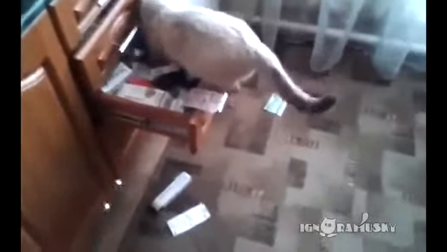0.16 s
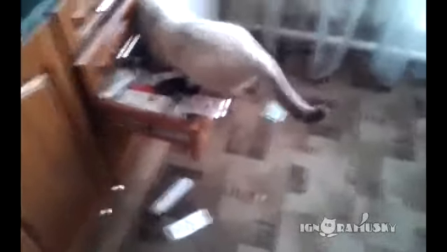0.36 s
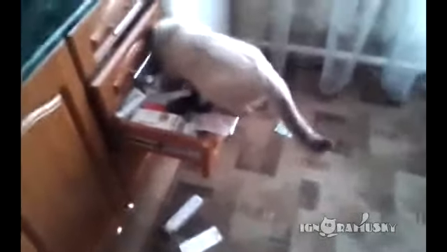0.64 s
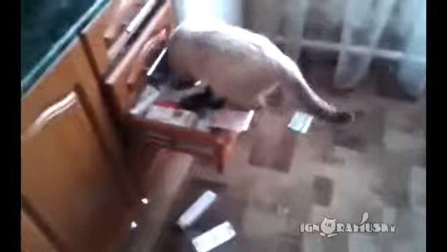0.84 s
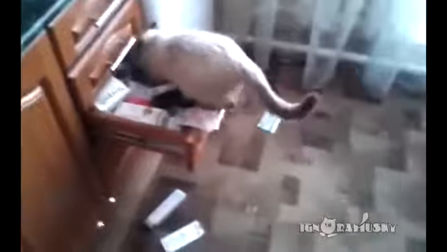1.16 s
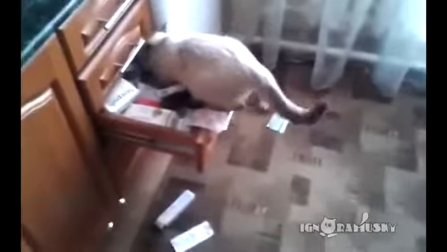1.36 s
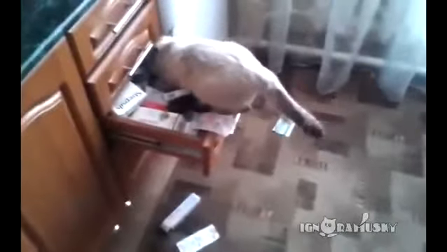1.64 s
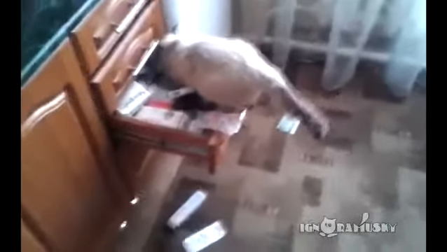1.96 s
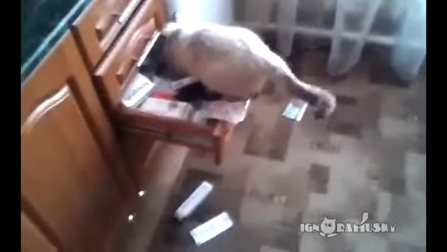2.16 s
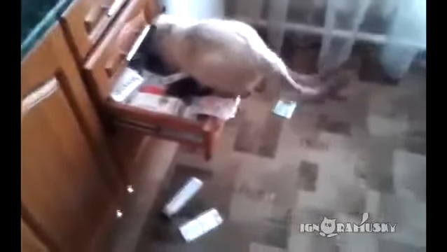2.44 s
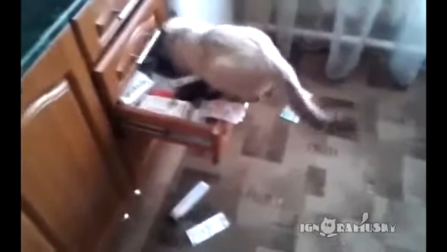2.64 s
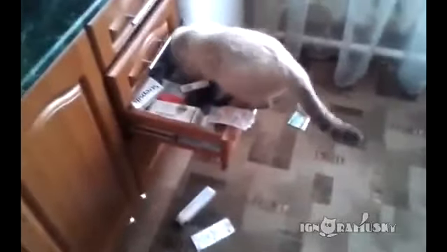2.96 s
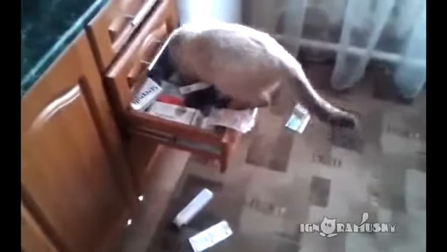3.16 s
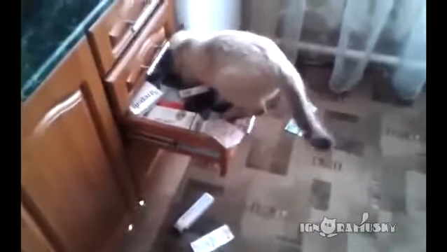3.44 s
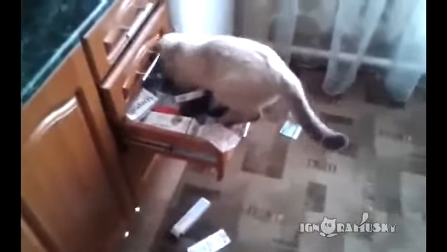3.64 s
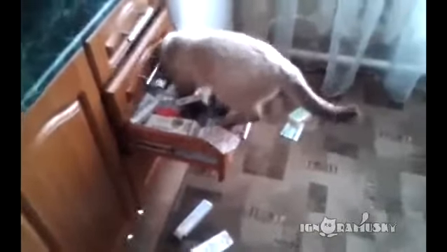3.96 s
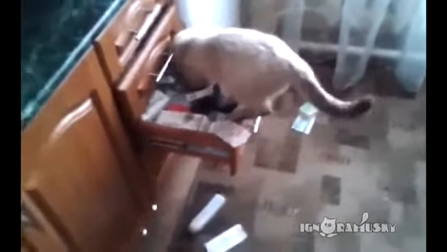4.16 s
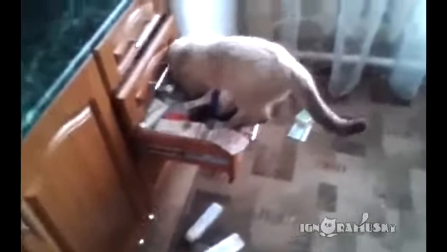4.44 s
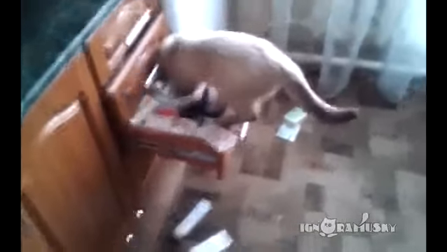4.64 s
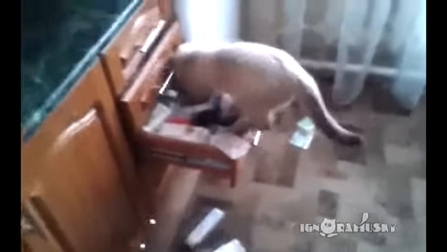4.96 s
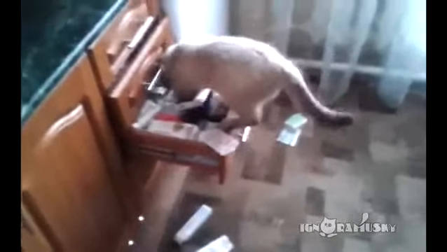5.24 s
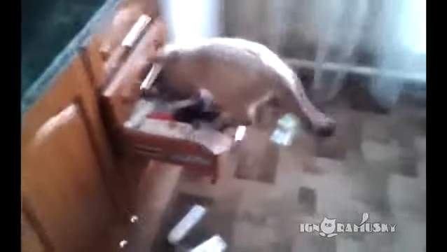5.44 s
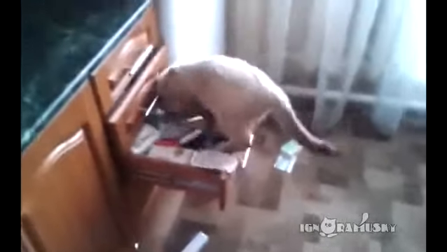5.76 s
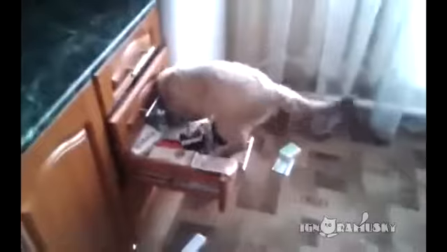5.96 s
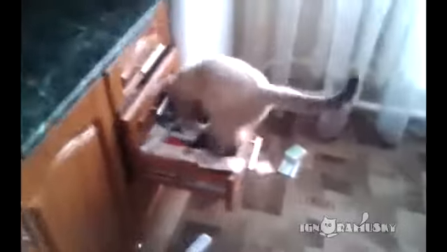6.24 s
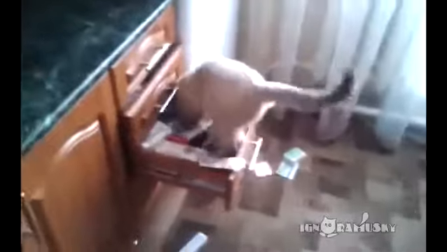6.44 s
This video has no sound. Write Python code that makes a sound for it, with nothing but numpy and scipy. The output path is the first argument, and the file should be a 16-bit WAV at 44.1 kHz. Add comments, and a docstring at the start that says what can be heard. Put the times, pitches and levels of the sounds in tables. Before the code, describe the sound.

Paws push cardboard boxes and wrappers around inside a wooden drawer. Uneven low-mid thuds and hollow knocks mix with crisp papery swipes and brief rasps, pausing around two seconds and returning stronger. The last second is the busiest, with bright film crinkles and sharp knocks. The room is small and quiet with a short reverberation; the hand-held microphone is fairly near, and a few dry snaps hit it directly.

```python
"""Cat in a kitchen drawer

Place: a small kitchen, where a cat digs about in an open wooden drawer; the room behind is quiet.
Its paws knock boxes against the wood: decaying modes boom, and filtered bursts of contacts clatter.
Paper and plastic wrappers rustle as clumps of tiny snaps; sliding things rasp through one resonance.
No distance at all: now and then a dry crackle of one-sided spikes sounds at the hand-held microphone."""
import sys
import numpy as np
from scipy import signal
from scipy.fft import rfft, irfft
from scipy.io import wavfile
from scipy.ndimage import uniform_filter1d, map_coordinates

SR = 44100
rng = np.random.default_rng(int(sys.argv[2]) if len(sys.argv) > 2 else 0)


def waveform_to_disk(signal):
    """Save audio, clipped to [-1, 1], as 16-bit WAV at the path in sys.argv[1]."""
    frames = np.transpose(np.atleast_2d(signal))
    scaled = np.clip(frames, -1, 1) * 32767
    samples = np.round(scaled).astype(np.int16)
    wavfile.write(sys.argv[1], SR, samples)


N = 291501  # length of the scene [samples]
T = np.arange(int(0.8 * SR)) / SR  # time axis of one short event [s]

# Quiet room, relative spectrum: f/Hz, density level/dB [per Hz]
HUSH_SPECTRUM = [(20,-3.5),(80,-17.5),(200,-12),(400,-28),(700,-43),(4000,-40),(13000,-45.5)]
# Reverberation of the kitchen: f/Hz, t60/s
KITCHEN_DECAY = [(150,0.44),(700,0.29),(2000,0.37),(5000,0.27),(12000,0.21)]
# Dry snaps close to the microphone: t/s, spike level before filtering/dB
CRACKLE_SNAPS = [(1.1695, -2.5), (1.172, -1.5), (1.181, -20), (3.7264, -15.5), (3.749, -14),
                 (3.7757, -12.5), (4.5923, -15), (4.5994, -21.5), (5.41, -2), (5.4212, -13.5), (5.596, -14),
                 (5.607, -8), (5.6095, -20), (5.6235, -32), (5.637, -9.5), (5.659, -16), (5.6671, -12.5)]
# Rasps and squeaks of sliding things, one row per resonance:
# t/s, length/s, mean f/Hz, width/Hz, level before fades and reflections/dB
SLIDE_RESONANCES = [(1.296,0.0592,1640,1400,-30),(1.494,0.024,2090,350,-35),(1.595,0.17,1090,300,-45.5),(3.23,0.035,2690,1900,-34.5),(3.364,0.034,1400,700,-44),(3.45,0.093,2690,1700,-51),(4.057,0.044,2590,900,-43.5),
                    (4.786,0.13,2480,497,-52.5),(5.342,0.051,5960,700,-44),(6.108,0.14,800,350,-35.5),(6.355,0.032,3750,504,-34),(6.428,0.068,3900,700,-38)]
# How hard the cat digs, as the level of boxes shuffling on the wood: t/s, level/dB
DIGGING_CURVE = [(0.0, -51), (0.72, -38), (1.05, -53.5), (1.269, -38), (1.8, -58), (2.25, -59.5),
                 (2.63, -49.5), (3.02, -55.5), (3.2, -36.5), (3.48, -45), (4.08, -37), (4.33, -54),
                 (4.6, -41.5), (5.53, -49.5), (5.71, -45.5), (6.3, -30), (6.48, -34.5), (6.61, -50.5)]
# A paw swipes over a packet: t/s, length/s, paper level/dB, film level against the paper/dB
PAW_SWIPES = [(0.288, 0.025, -57, -18), (0.721, 0.022, -41, -1), (0.9, 0.035, -42.5, -16),
              (0.98, 0.089, -44, -18), (1.166, 0.13, -41, -8.5), (1.278, 0.047, -31, -1),
              (1.484, 0.024, -37, 1.5), (1.588, 0.025, -30, -14), (1.619, 0.084, -35.5, -13.5),
              (2.626, 0.076, -45, -14), (2.815, 0.045, -45.5, -17), (3.073, 0.027, -37, -6.5),
              (3.234, 0.042, -37, -30), (3.36, 0.03, -41, -30), (3.614, 0.02, -38, -33),
              (3.886, 0.065, -30.5, -12.5), (4.681, 0.13, -39.5, -19), (5.186, 0.12, -41.5, -11),
              (5.339, 0.034, -37, -7), (5.714, 0.2, -41, -3.5), (5.867, 0.11, -29, -7.5),
              (5.956, 0.4, -57, 9.5), (6.179, 0.06, -32, 7.5), (6.215, 0.28, -44, 6.5),
              (6.314, 0.26, -38.5, -10)]
# Relative spectra of shuffling boxes, paper and plastic film: f/Hz, density level/dB [per Hz]
SHUFFLE_SPECTRUM = [(50,-42),(110,-4),(155,-20),(315,3.5),(520,-10),(800,-10),(1200,-24),(2500,-51)]
PAPER_SPECTRUM = [(300,-14),(900,5),(1500,-0.5),(2400,-2),(4200,-3.5),(6000,-7),(9000,-19.5),(13000,-117)]
FILM_SPECTRUM = [(3000,12),(6000,4),(8200,8.5),(10500,4),(13000,0.5)]
# Relative spectrum of the clattering contents: f/Hz, density level/dB [per Hz]
CLATTER_SPECTRUM = [(70,6),(120,-13.5),(300,10),(740,5),(1300,-2.5),(1900,-2.5),(2800,-10.5),(4000,-9),(6000,-16),(8200,-19),(13000,-41)]
# Modes of the drawer and cabinet: f/Hz, mean relative level/dB, t60/s
DRAWER_MODES = [(105.5,0,0.074),(197.3,-7.5,0.33),(263,-2,0.12),(312.2,10.5,0.077),(324.7,-6,0.4),(373,4.5,0.033),(430.6,-3,0.25),(593.7,-10,0.15),(647,-2,0.21),(712.5,2.5,0.066),(804,-2.5,0.16),(889,-4.5,0.36),(983,-6,0.18),(1416,-19.5,0.63)]
# Blows on the drawer: t/s, time that things keep jostling/s, strength level/dB,
# hardness of the contact/dB, weight behind it/dB, struck box f/Hz
DRAWER_KNOCKS = [(0.047, 0.015, -37.5, -1, -10, 347), (0.123, 0.0052, -24, -9.5, -13, 335),
                 (0.178, 0.022, -38.5, -2.5, -6, 840), (0.412, 0.048, -38.5, -5, -2, 453),
                 (0.479, 0.0036, -28, -9, -17, 330), (0.567, 0.014, -28.5, -6.5, -33, 373),
                 (0.726, 0.03, -28.5, -4.5, -5.5, 374), (0.99, 0.0055, -42, 1.5, -10, 970),
                 (1.293, 0.037, -25, 3.5, 2.5, 362), (1.494, 0.047, -38, 5.5, 4, 920),
                 (1.599, 0.054, -51, 13.5, 15, 1060), (2.026, 0.00052, -53.5, 3.5, -2, 490),
                 (2.493, 0.041, -45, -3, -7, 380), (2.645, 0.0062, -45.5, -4, 3.5, 376),
                 (2.672, 0.0074, -31.5, -21, -32, 308), (2.704, 0.03, -41, -6, -12, 386),
                 (2.748, 0.018, -37, -9.5, -0.5, 310), (2.838, 0.0069, -46, -13, -6, 340),
                 (3.024, 0.13, -38, -3.5, -2.5, 1180), (3.0833, 0.025, -27, -0.5, -0.5, 503),
                 (3.238, 0.029, -33.5, 0.5, -25, 1360), (3.268, 0.005, -28.5, -28, -31, 336),
                 (3.366, 0.011, -37, 0, -17, 720), (3.57, 0.023, -34, -32, -28, 317),
                 (3.632, 0.0024, -24, -13, -10, 320), (3.895, 0.0084, -26, 2, -3.5, 694),
                 (3.905, 0.044, -18, -2.5, -14, 307), (4.118, 0.12, -36, -5.5, -33, 745),
                 (4.445, 0.017, -33.5, -7.5, -14, 376), (4.681, 0.015, -19, -4.5, -24, 680),
                 (4.724, 0.0071, -28, -6, -7, 396), (5.005, 0.033, -42.5, -6, -4, 356),
                 (5.23, 0.049, -25, -2, -7, 387), (5.273, 0.0088, -24.5, -11, -9, 314),
                 (5.423, 0.0063, -24, -9, -31, 342), (5.636, 0.037, -38.5, -0.5, -0.5, 330),
                 (5.893, 0.032, -22, -9.5, -25, 310), (6.068, 0.0066, -21.5, -6, -27, 504),
                 (6.193, 0.018, -24.5, 6, -7.5, 794), (6.209, 0.0038, -17.5, -2.5, -9, 408),
                 (6.226, 0.0059, -22.5, 2.5, -11, 1050), (6.359, 0.011, -35.5, 7.5, -18, 810),
                 (6.405, 0.054, -29.5, -6, 2.5, 415)]

RESONANCE_WIDTH = 0.22  # width of a box's or a spot's resonance, as a share of its pitch
SPOT_RING_DB, BOX_RING_DB = 8, 12.5  # lift of the touched spot's and the struck box's resonance
CATCHES_PER_S = 80  # how often the grip and the touched spot change
USUAL_DIGGING_DB = -45  # middle of the digging curve
PAPER_DB, PAPER_FOLLOWS = -52, 1  # loose paper at usual digging; its swing [dB per dB of digging]
LOOSE_FILM_DB = -18  # film stirred along with the paper, against it
SWIPE_RAMP = 0.18  # share of a swipe spent building up, and again letting go
SLIDE_SAG = 0.08  # pitch lost along a slide, as a share of its mean
SPLINTER_DB, SPLINTER_S = -18, 0.006  # splinters around a snap: mean level against it, time spread
BLUNTING = 0.34  # weaker snaps last longer and sound duller [dB of width per dB]
CRACK_DB, CRACK_PER_HARDNESS = -10.5, 0.63  # crack against clack; its extra growth [dB per dB]
MODE_WANDER, WANDER_PER_S = 0.028, 47.3  # modes' detuning: share of pitch, turns per second


def from_db(db):
    """Decibels to amplitude gain."""
    return 10 ** (np.asarray(db) / 20)


def rms_one(x):
    """Scale to unit power."""
    return x / np.sqrt(np.mean(x ** 2) + 1e-20)


def crest_one(x, size=880):
    """Scale so that the loudest 20 ms have unit power."""
    power = uniform_filter1d(x ** 2, size, mode="constant")
    return x / np.sqrt(power.max() + 1e-20)


def at_hz(points, hz):
    """Read a table on a log-frequency axis."""
    f, value = np.transpose(points)
    return np.interp(np.log(hz + 1), np.log(f), value)


def cut(x, hz, kind, order=2):
    """Butterworth filter."""
    return signal.sosfilt(signal.butter(order, hz, kind, fs=SR, output="sos"), x + 1e-18)


def colour(x, spectrum, size=4096):
    """Causal (minimum-phase) filter with the shape of the given spectrum."""
    gain = from_db(at_hz(spectrum, np.fft.rfftfreq(size, 1 / SR)))
    cepstrum = irfft(np.log(gain))
    # folding the cepstrum into its first half makes the phase minimal
    response = irfft(np.exp(rfft(2 * cepstrum[:size // 2], size)))
    return signal.fftconvolve(x, response)[:len(x)]


def resonate(x, hz, width_hz):
    """One resonance, with unit gain at its top."""
    r = np.exp(-np.pi * width_hz / SR)
    poles = [1, -2 * r * np.cos(2 * np.pi * hz / SR), r * r]
    return (1 - r * r) / 2 * signal.lfilter([1, 0, -1], poles, x)


def add(track, s, sound):
    """Mix a sound in at a time."""
    i = max(round(s * SR), 0)
    track[i:i + len(sound)] += sound[:max(N - i, 0)]


def grains(per_s, spread_db, size):
    """Random clicks of uneven strength and either sign."""
    strength = from_db(spread_db * np.minimum(rng.exponential(1, size), 4))
    happens = rng.random(size) < per_s / SR
    return happens * strength * rng.choice([-1, 1], size)


def kitchen(x, early_db, late_db, early_t60=0.1):
    """Direct sound, quick reflections off the cabinet, and the room's tail dying by band."""
    edges = np.geomspace(60, 15000, 9)
    tail = np.zeros(len(T))
    for lo, hi in zip(edges, edges[1:]):
        t60 = at_hz(KITCHEN_DECAY, np.sqrt(lo * hi))
        band = cut(rng.standard_normal(len(T)), [lo, hi], "band")
        tail += band * from_db(-60 * T / t60)
    early = rng.standard_normal(len(T)) * from_db(-60 * T / early_t60)
    response = from_db(early_db) * early / np.linalg.norm(early)
    response += from_db(late_db) * tail / np.linalg.norm(tail)
    return x + signal.fftconvolve(x, response)[:len(x)]


def room_hush():
    """The quiet room: steady noise, strongest in the bass."""
    return from_db(-53) * rms_one(colour(rng.standard_normal(N), HUSH_SPECTRUM))


def crackle(width_s=0.00008, recoil_hz=70, thud_db=-22, thud_s=0.01,
            grit_db=-32, grit_s=0.024, top_hz=8800):
    """Dry one-sided spikes in clusters, each with a slight thud and slow recoil, amid rubbing grit."""
    out = np.zeros(N)
    lead_s = 0.012  # the grit starts ahead of the snap
    for s, db in CRACKLE_SNAPS:
        splinters = rng.normal([s, db + SPLINTER_DB], [SPLINTER_S, 3], size=(4, 2))
        for start, peak_db in [(s, db), *splinters]:
            width = width_s * from_db(-BLUNTING * peak_db + rng.normal(0, 2.2))
            spike = np.exp(-T / width)
            thud = from_db(thud_db) * np.exp(-T / thud_s)
            add(out, start, from_db(peak_db) * (spike + thud))
        # the grit rises twice as fast as it falls
        swell = np.exp(-np.maximum(T - lead_s, 2 * (lead_s - T)) / grit_s)
        grit = rms_one(cut(grains(900, 1.56, len(T)), 570, "low", order=1)) * swell
        add(out, s - lead_s, from_db(db + grit_db) * grit)
    recoiling = cut(out, recoil_hz, "high", order=1)
    return cut(recoiling, top_hz, "low")


def slides():
    """Stick-slip friction excites one resonance of the sliding thing, which sags as it slows."""
    out = np.zeros(N)
    for s, length_s, hz, width_hz, db in SLIDE_RESONANCES:
        size = int(length_s * SR)
        rasp = resonate(grains(1800, 0.93, size), hz, width_hz)
        speed = 1 + SLIDE_SAG * np.linspace(0.5, -0.5, size)
        # reading the rasp ever more slowly lowers its pitch
        sagging = map_coordinates(rasp, [np.cumsum(speed)])
        sagging = cut(sagging, [hz / 2, hz * 1.5], "band")
        add(out, s, from_db(db) * rms_one(sagging) * signal.windows.tukey(size, 0.3))
    return kitchen(out, early_db=-9, late_db=-6)


def swipe_pressure():
    """Each swipe builds up, holds and lets go: its pressure on the paper and on the film."""
    paper, film = np.zeros((2, N))
    for s, length_s, db, film_db in PAW_SWIPES:
        shape = np.interp(T / length_s, [0, SWIPE_RAMP, 1 - SWIPE_RAMP, 1], [0, 1, 1, 0])
        press = from_db(db) * shape
        add(paper, s, press)
        add(film, s, from_db(film_db) * press)
    return paper, film


def rustle(pressure, spectrum, ring_hz, per_s, spread_db, clump_db, count=7):
    """Tiny slips and creases snap in clumps, scaled by pressure; each spot has its ring and echoes."""
    catch = np.arange(N) / SR * CATCHES_PER_S
    grip = rng.standard_normal(int(catch[-1]) + 2)
    clumps = from_db(clump_db * np.interp(catch, np.arange(len(grip)), grip))
    snaps = pressure * rms_one(grains(per_s, spread_db, N) * clumps)
    # each catch lands on one of a few spots in the drawer
    spot = rng.integers(0, count, len(grip))[catch.astype(int)]
    dry_snap = colour(signal.unit_impulse(len(T)), spectrum)
    out = np.zeros(N)
    for k, hz in enumerate(np.geomspace(*ring_hz, count)):
        ring = resonate(dry_snap, hz, RESONANCE_WIDTH * hz)
        ringing = dry_snap + from_db(SPOT_RING_DB) * ring
        echoing = kitchen(ringing, early_db=1.5, late_db=1.0)
        out += signal.oaconvolve(snaps * (spot == k), echoing / np.linalg.norm(echoing))[:N]
    return out


def rummaging():
    """Boxes shuffle, paper rustles, plastic film crinkles; all follow the digging, swipes add to wrappers."""
    digging_db = np.interp(np.arange(N) / SR, *np.transpose(DIGGING_CURVE))
    loose = from_db(PAPER_DB + PAPER_FOLLOWS * (digging_db - USUAL_DIGGING_DB))
    paper_swipe, film_swipe = swipe_pressure()
    on_paper = np.hypot(loose, paper_swipe)
    on_film = np.hypot(from_db(LOOSE_FILM_DB) * loose, film_swipe)
    boxes = rustle(from_db(digging_db), SHUFFLE_SPECTRUM, (200, 800),
                   per_s=800, spread_db=-1.0, clump_db=4.5)
    paper = rustle(on_paper, PAPER_SPECTRUM, (850, 3800), per_s=550, spread_db=5.0, clump_db=4.5)
    film = rustle(on_film, FILM_SPECTRUM, (6500, 11000), per_s=450, spread_db=3, clump_db=4.0)
    return boxes + paper + film


def drawer_ring(push, impact):
    """Modes take energy at the impact and while pushed, and waver as the load shifts."""
    feed = push ** 2
    feed[0] += impact * feed.sum()
    out = np.zeros(len(T))
    for hz, db, t60 in DRAWER_MODES:
        # energy falls by 60 dB in t60
        energy = signal.lfilter([1], [1, -from_db(-120 / (t60 * SR))], feed)
        load = rng.standard_normal(size=64)
        detune = 1 + MODE_WANDER * np.interp(T * WANDER_PER_S, np.arange(len(load)), load)
        phase = 2 * np.pi * (hz * np.cumsum(detune) / SR + rng.random() / 2)
        level = from_db(db + rng.normal(0, 4.3))  # each blow excites the modes differently
        out += level * np.sqrt(energy) * np.sin(phase)
    return crest_one(out)


def knock(jostle_s, strength_db, hardness_db, weight_db, box_hz):
    """A contact and a scatter of small ones: drawer rings, contents clatter, the box colours both."""
    clack_db = strength_db + hardness_db
    crack_db = clack_db + CRACK_DB + CRACK_PER_HARDNESS * hardness_db
    thud_db = strength_db + weight_db
    push = np.exp(-(T / jostle_s) ** 3)
    contacts = grains(1000, 6.6, len(T)) * push
    contacts[0] = 0.7 * np.linalg.norm(contacts) + 1  # the first contact
    echoing = kitchen(contacts, early_db=6.5, late_db=8.0)
    clatter = crest_one(colour(echoing, CLATTER_SPECTRUM))
    wood = drawer_ring(push, impact=0.41) + from_db(-5.5) * clatter
    wood = wood + from_db(BOX_RING_DB) * resonate(wood, box_hz, RESONANCE_WIDTH * box_hz)
    thud = from_db(thud_db) * crest_one(cut(wood, 198.3, "low", order=6))
    boom = from_db(strength_db) * crest_one(cut(wood, [170, 540], "band", order=3))
    # a softer contact has less crack, and its clack stops lower
    top_hz = np.clip(1900 * from_db(1.27 * (crack_db - clack_db + 13.5)), 1050, 2100)
    clack = from_db(clack_db) * crest_one(cut(wood, [540, top_hz], "band", order=3))
    # the fine crunch builds up as the contents are squeezed
    crunch = cut(clatter, 1700, "high", order=4) * (1 - np.exp(-T / 0.004))
    crack = from_db(crack_db) * crest_one(crunch)
    return thud + boom + clack + crack


def knocks():
    """Paws shove boxes against the drawer."""
    out = np.zeros(N)
    for s, *blow in DRAWER_KNOCKS:
        add(out, s, knock(*blow))
    return cut(out, 102, "high")


def scene():
    """Everything meets in the middle over the quiet of the room."""
    mid = room_hush() + crackle() + slides() + rummaging() + knocks()
    # a faint stereo width, chosen for this mix: filtered reflections, opposite in left and right
    reflections = kitchen(mid, early_db=-41, late_db=-16.0) - mid
    side = cut(reflections, 4920, "high", order=12)
    return np.array([mid + side, mid - side])


def record(dry):
    """The top end is cut steeply above 13.3 kHz by an elliptic low-pass."""
    low_pass = signal.ellip(10, 0.2, 70, 13300, fs=SR, output="sos")  # ripple and stop depth in dB
    return signal.sosfilt(low_pass, dry)


dry = scene()
out = record(dry)
waveform_to_disk(out)
```